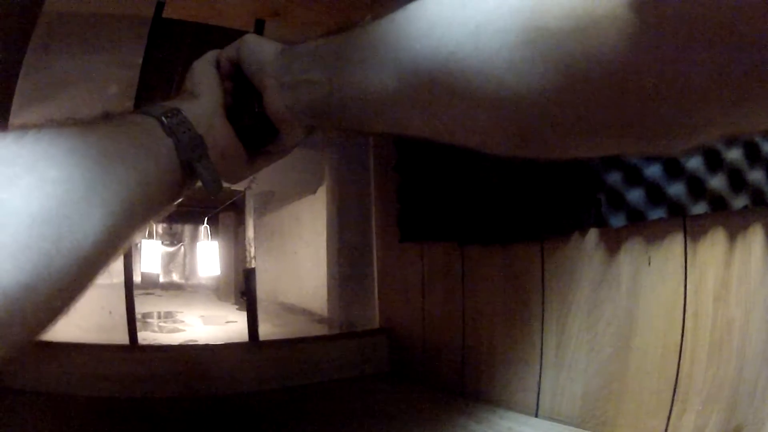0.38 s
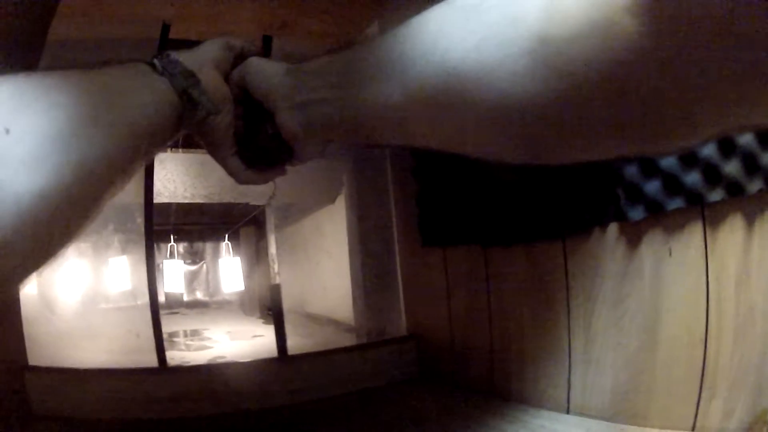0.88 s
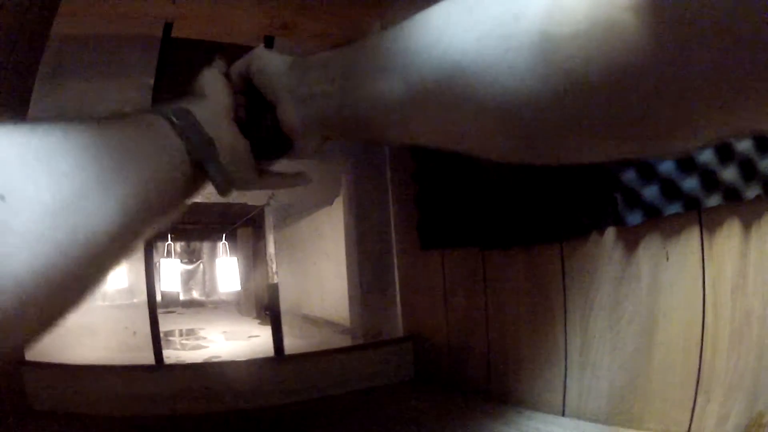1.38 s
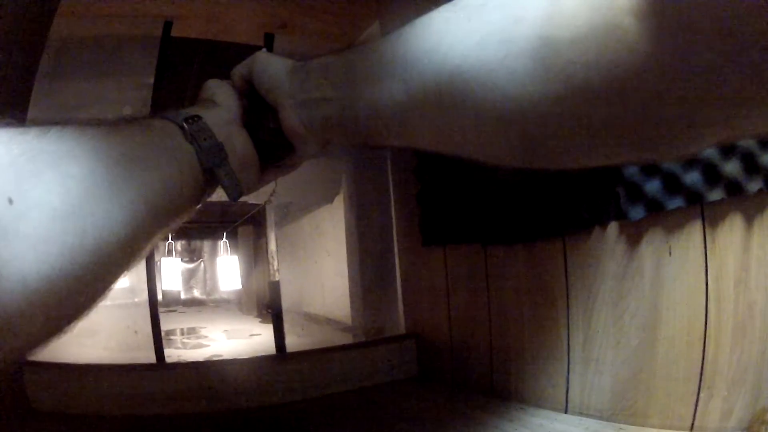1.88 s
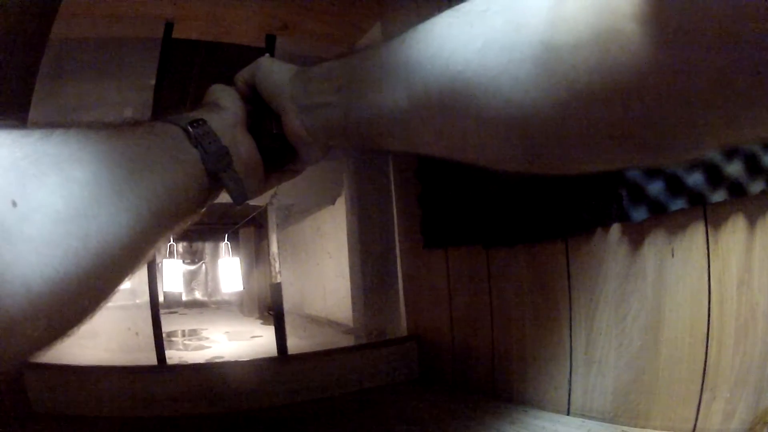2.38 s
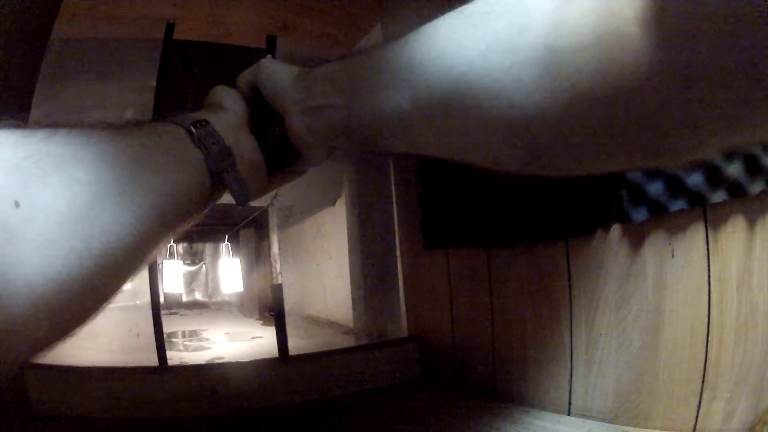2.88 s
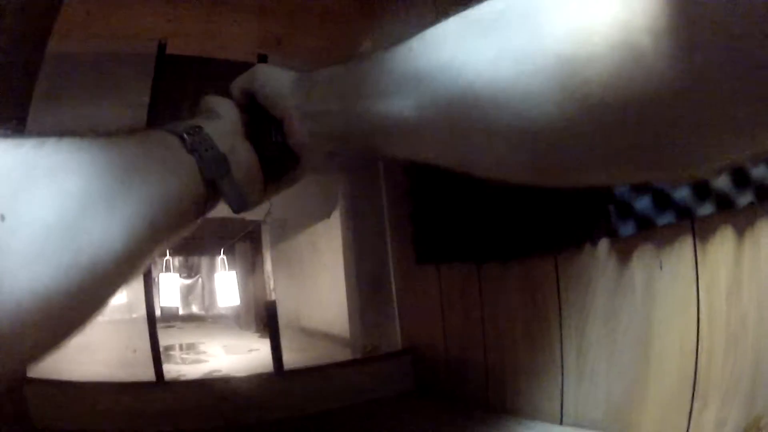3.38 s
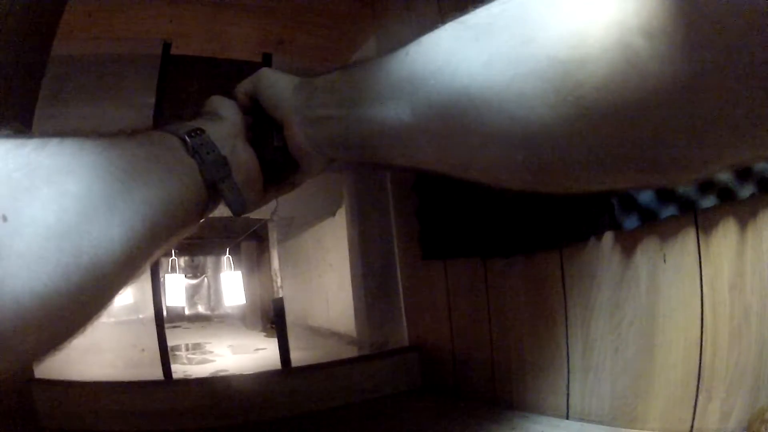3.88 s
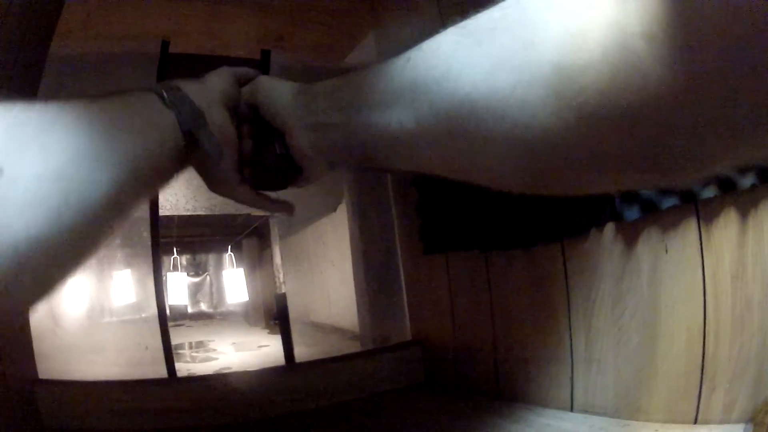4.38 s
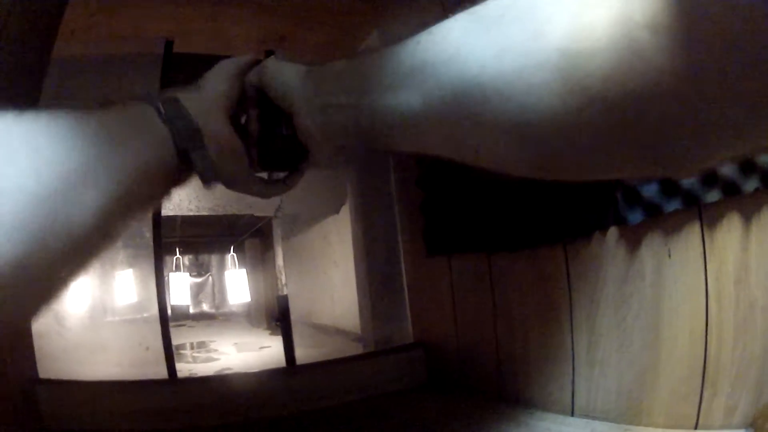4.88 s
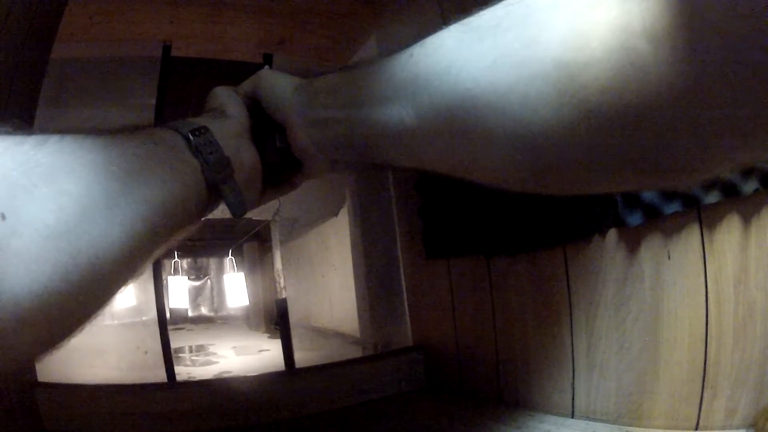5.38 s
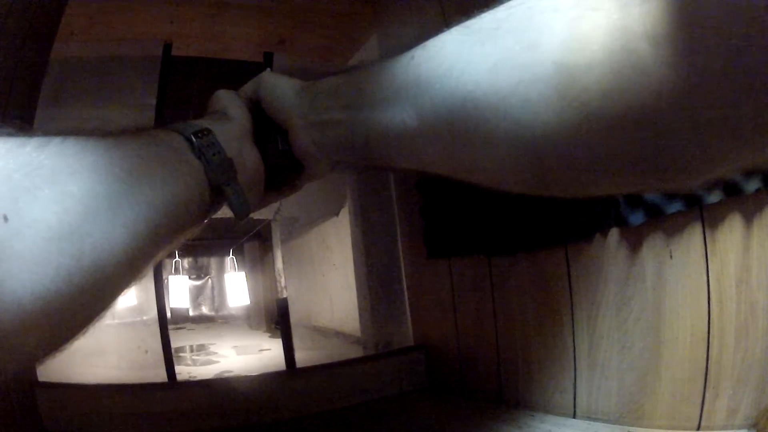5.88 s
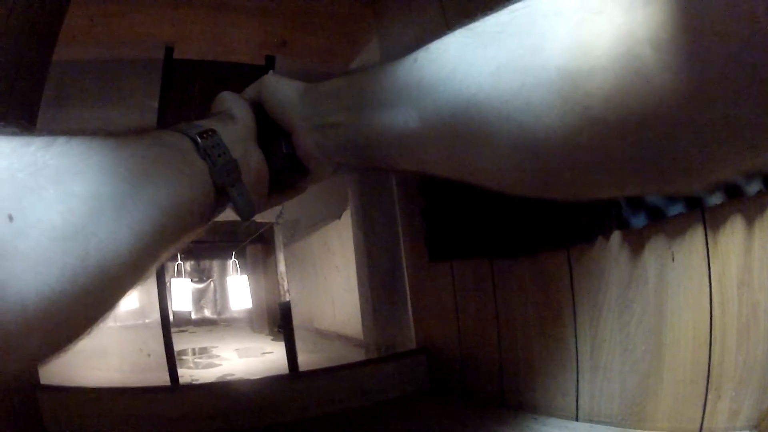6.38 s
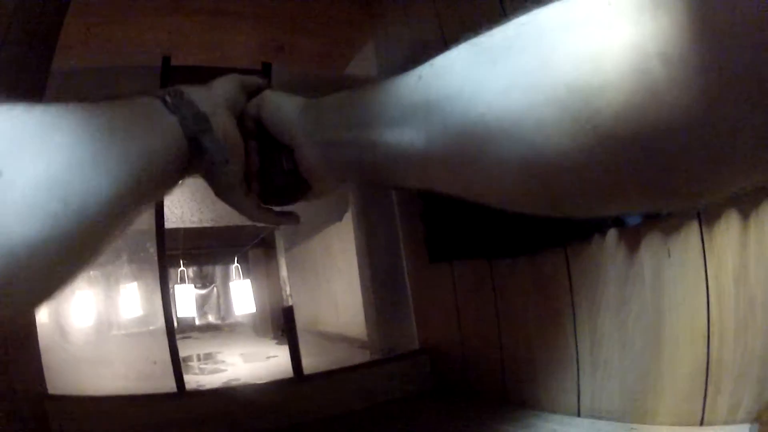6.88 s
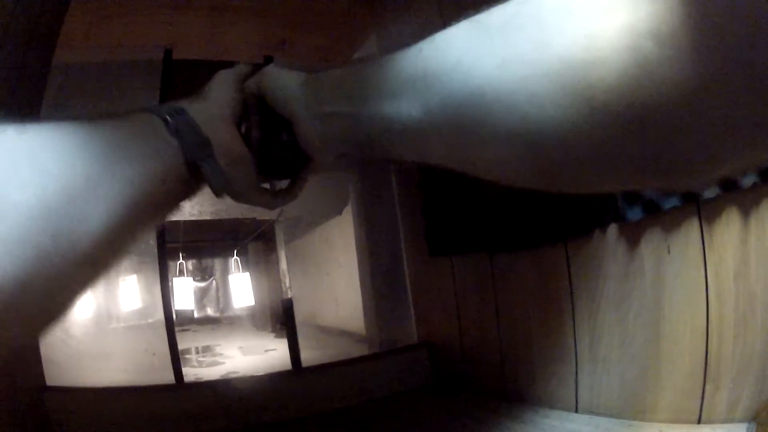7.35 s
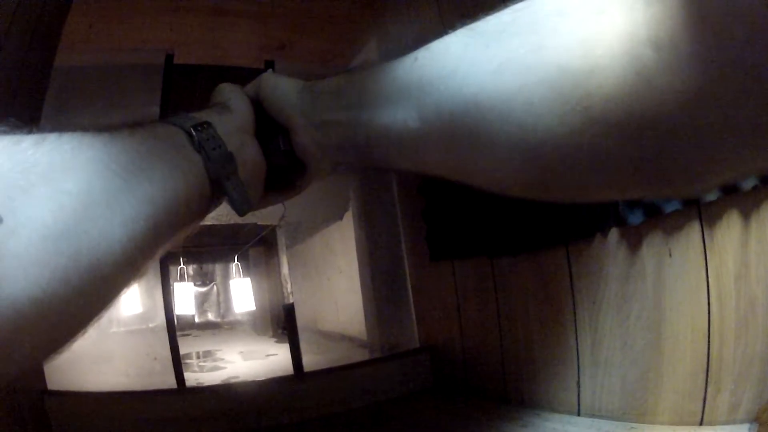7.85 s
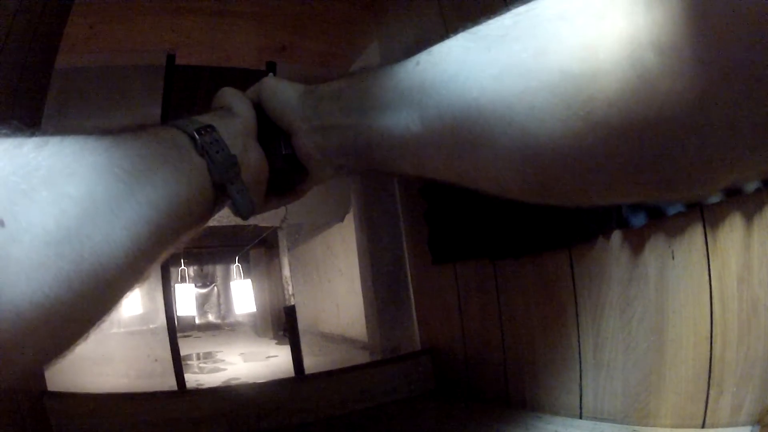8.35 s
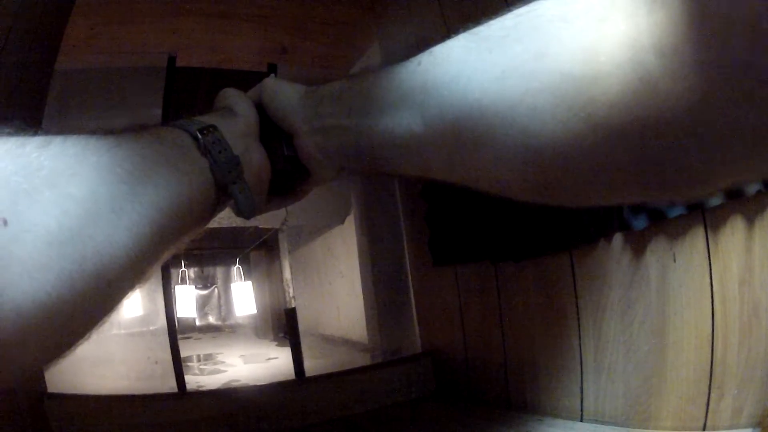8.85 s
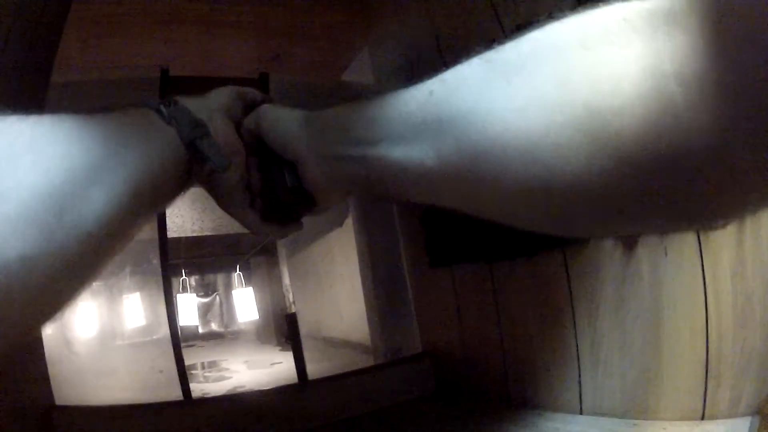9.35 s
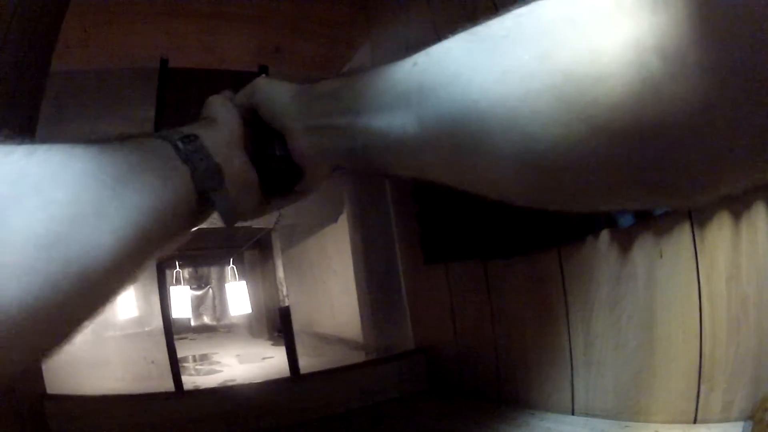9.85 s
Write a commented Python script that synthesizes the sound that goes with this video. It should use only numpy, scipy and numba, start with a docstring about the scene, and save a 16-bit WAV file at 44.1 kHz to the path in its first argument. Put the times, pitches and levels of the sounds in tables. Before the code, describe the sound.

A steady, quiet ventilation hum with fuzzy low fan tones fills an indoor range booth. Around 0.7-0.9 s hands and sleeves rub briefly with small dull ticks; at 1.05 s the pistol hammer is cocked, a crisp cluster of short steel clicks. Near-quiet follows, with barely audible rubs around 1.5 and 2.4 s. At 3.1 s a handgun shot bursts out, hard and clipped; the level drops sharply, then a hollow, ringing lane echo swells and decays for over a second. Light ticks at 4.5 s and another cocking at 4.7 s. The second shot comes at 6.5 s with a thinner, less bassy echo, and a cocking at 7.15 s sounds within its tail. The third and strongest blast is at 8.9 s, cocking again at 9.5 s over the fading echo. The close cased camera sounds boxy, nearly mono, with gritty treble.

```python
"""Indoor range, three shots

Three handgun shots in a range booth over ventilation hum; between them hands shift and the hammer clicks back.
Shots are noise bursts, pressure pulses and case ring with a band-wise decaying echo; clicks are steel modes.
Rubbing is flickering noise, ventilation is shaped noise with fuzzy fan tones.
A cased action camera overloads; its late gain control cuts deep and lets go, so the dying echo swells first.
Sampling is at a low rate and each sample is held, which mirrors the spectrum into the treble."""
import sys
import numpy as np
from scipy import signal
from scipy.io import wavfile
from scipy.ndimage import uniform_filter1d
from numba import njit

SR = 44100
rng = np.random.default_rng(int(sys.argv[2]) if len(sys.argv) > 2 else 0)


def dump_mix(stems):
    """Bounce the given channels to the path in sys.argv[1] as a 16-bit WAV at rate SR."""
    frames = np.atleast_2d(stems).T  # one column per channel
    limited = np.clip(frames, -1, 1)  # hard clip at full scale
    pcm = np.round(limited * 32767).astype(np.int16)
    wavfile.write(sys.argv[1], SR, pcm)


def invert_db(x):
    """Field ratio 10**(x/20) for x, a level in decibels (scalar or array-like)."""
    u = np.asarray(x, float) / 20
    return 10 ** u


N = 440559


def evened(x):
    """Scales to unit rms."""
    return x / np.sqrt(np.mean(x ** 2) + 1e-20)


def read(points, hz):
    """Interpolates a table over log frequency."""
    f, value = np.transpose(points)
    return np.interp(np.log(hz + 1), np.log(f + 1), value)


def humps_db(table, hz):
    """Rounded peaks on a spectrum."""
    return sum(db / (1 + (2 * (hz - f) / width) ** 2) for f, width, db in table)


def add(mix, start_s, sound):
    """Adds a sound in place, cut at the end of the mix."""
    part = mix[round(start_s * SR):][:len(sound)]
    part += sound[:len(part)]


def noise(count, db_at, size=1024):
    """Random short-time spectra shaped by db_at(Hz, s)."""
    hop = size // 4
    frames = count // hop + 5
    hz = np.fft.rfftfreq(size, 1 / SR)[:, None]
    real, imag = rng.standard_normal((frames, len(hz), 2)).T
    spectra = (real + 1j * imag) * invert_db(db_at(hz, np.arange(frames) * hop / SR))
    return signal.istft(spectra, nperseg=size, noverlap=size - hop)[1][:count]


def band(count, hz, width_hz):
    """Noise through one resonance: a fuzzy tone of unit rms."""
    pole = np.exp(-np.pi * width_hz / SR)
    slow = signal.lfilter([1], [1, -pole], rng.standard_normal((count, 2)) @ [1, 1j])
    return evened((slow * np.exp(2j * np.pi * hz * np.arange(count) / SR)).real)


# booth burst spectrum: (frequency [Hz], relative density [dB])
BLAST_SPECTRUM = [(18, -25.5), (30, 5), (486, 6), (619, -2), (790, -9), (1640, -16.5), (2230, -5.5),
                  (3790, -9), (4630, -23.5), (5900, -21), (7670, -47), (13000, -120)]


def shot(room_bass, blast_db, echo_db, bass_db):
    """Crack, pressure push, ringing camera case and booth burst; then the echo builds up."""
    t = np.arange(2 * SR) / SR
    burst = evened(noise(len(t), lambda hz, s: read(BLAST_SPECTRUM, hz))) * invert_db(-60 * t / 0.28)
    case_ring = 0.4 * band(len(t), 2350, 300) * invert_db(-60 * t / 0.032)
    rise = 1 - np.exp(-(t / 0.0018) ** 2)
    crack = 0.2 * band(len(t), 4300, 900) * invert_db(-60 * t / 0.012)
    u = np.maximum(t - 0.0003, 0) / 0.00035
    push = -0.45 * u ** 2 * (1 - 0.38 * u) * np.exp(2 - u)
    heave = -0.3 * np.sin(2 * np.pi * 45 * t) * invert_db(-60 * t / 0.12)  # the air of the booth heaves
    blast = (burst + case_ring) * rise + crack + push + heave
    echo = (invert_db(bass_db) * room_bass + lanes(low=False)) * (1 - np.exp(-t / 0.0092))
    return invert_db(blast_db) * blast + invert_db(echo_db) * echo


# long-lane echo spectrum: (frequency [Hz], relative density [dB])
ECHO_SPECTRUM = [(35, -61.5), (60, -34), (113, -11), (194, -20.5), (301, -4.5), (386, -15), (515, -4),
                 (589, -9), (833, -2), (1540, -9.5), (2300, -1.5), (3510, -10), (5900, -20), (7670, -59.5),
                 (13000, -120)]
# lane decay: (frequency [Hz], t60 [s])
LANE_T60 = [(60, 1.3), (150, 1.3), (300, 1.24), (700, 1.34), (1500, 1.264), (3000, 1.13), (5900, 0.96)]
# low standing waves between booth walls: (frequency [Hz], width [Hz], boost [dB])
BOOTH_MODES = [(120, 25, 7.5), (300, 58, 4), (460, 86, 6), (672, 30, 13)]


def lanes(low):
    """The long lanes ring on, each band at its own speed: the part below or above the crossover."""
    crossover_hz, slope = 900, 4 if low else -4

    def db_at(hz, s):
        share_db = -10 * np.log10(1 + ((hz + 1) / crossover_hz) ** slope)
        decay_db = -60 * (s - 0.45) / read(LANE_T60, hz)
        return read(ECHO_SPECTRUM, hz) + humps_db(BOOTH_MODES, hz) + decay_db + share_db

    return invert_db(-37.5) * noise(2 * SR, db_at)


# standing waves of the lanes; close pairs beat: (frequency [Hz], relative level [dB], t60 [s])
LANE_MODES = [(120, -39, 4), (124.6, -9, .3), (292.6, -13, 1.0), (293.9, -15, 1.0), (303, -24, 1.6),
              (477, -21, 1.4), (484, -30, 1.8), (514.3, -22, 1.3), (521, -7, .7)]


def standing_waves():
    """Pure low tones that start together and die away."""
    t = np.arange(2 * SR) / SR
    return sum(invert_db(db - 60 * t / t60) * np.sin(2 * np.pi * hz * t) for hz, db, t60 in LANE_MODES)


# steel modes: (nominal frequency [Hz], relative level [dB], t60 before the common fade [s])
STEEL_MODES = [(1367, -10.5, 0.077), (1790, -4.5, 0.1), (2160, -7, 0.065), (2430, -0.5, 0.062),
               (2640, -4.5, 0.064), (2970, -16, 0.088), (3380, -7.5, 0.076), (3736, -18, 0.11),
               (4610, -0.5, 0.069), (5660, -2.5, 0.033)]
# noise of a click: (frequency [Hz], relative density [dB])
SCRATCH_SPECTRUM = [(600, -15), (1400, -11.5), (2100, -1.5), (3600, -1.5), (5000, -4.5), (5900, -18)]


def click(db, bright_db_per_octave, t60_s, ring_hz):
    """A steel part snaps: its modes ring briefly, the struck spot pings, over a scratch of noise."""
    t = np.arange(round(0.2 * SR)) / SR

    def spot_db(hz):
        return bright_db_per_octave * np.log2(hz / 2500) + humps_db([(ring_hz, 600, 6)], hz)

    def tail_db(hz, s):
        return read(SCRATCH_SPECTRUM, hz) - 1.2 * np.log2((hz + 1) / 2500)

    ring = np.zeros(len(t))
    for hz, level_db, decay_s in STEEL_MODES:
        detune, phase, strength = rng.random(3)
        mode_db = level_db + 3.8 * (strength - 2) + spot_db(hz)
        mode_hz = hz * (1 + 0.034 * (detune - 0.5))
        ring += invert_db(mode_db - 60 * t / decay_s) * np.sin(2 * np.pi * (mode_hz * t + phase))
    ping = 0.43 * np.sin(2 * np.pi * ring_hz * t) * invert_db(-60 * t / 0.038)
    scratch = evened(noise(len(t), lambda hz, s: read(SCRATCH_SPECTRUM, hz) + spot_db(hz + 1), size=256))
    tail = evened(noise(len(t), tail_db, size=256)) * invert_db(-34 - 60 * t / 0.4)
    rise = 1 - np.exp(-(t / 0.0006) ** 2)
    body = (0.42 * ring + ping + 0.35 * scratch) * invert_db(-60 * t / t60_s)
    return invert_db(db) * (body + tail) * rise


# the hammer is cocked: (time [s], level [dB], favoured ring [Hz])
COCKINGS = [(1.0482, -18.5, 3850), (4.715, -22.5, 3920), (7.1482, -19, 2910), (9.519, -20, 2000)]
# the parts settle after a cocking: (delay [s], relative level [dB])
SETTLINGS = [(0, 0.5), (.0052, -5), (.0108, -6.5), (0.0184, -15.5)]
# single ticks of small parts: (time [s], level [dB], brightness [dB/octave], favoured ring [Hz])
SMALL_TICKS = [(0.8355, -44, -14, 1210), (0.8649, -32.5, -8.5, 1120), (0.9112, -44, -8, 1900),
               (0.9757, -50.5, 0, 2000), (1.0006, -46, 0, 2724), (1.281, -50, -3, 1920),
               (4.5431, -27, -1.5, 2000), (4.656, -44.5, 2, 3150), (4.8065, -45.5, 3, 2390),
               (7.2647, -38.5, 0, 2384)]


def action_clicks():
    """Cockings as clusters of settling clicks, and single ticks."""
    out = np.zeros(N)
    lead_s = 0.001
    for s, db, ring_hz in COCKINGS:
        for delay_s, less_db in SETTLINGS:
            add(out, s + delay_s - lead_s, click(db + less_db, 1.5, 0.033, ring_hz))
    for s, db, bright_db_per_octave, ring_hz in SMALL_TICKS:
        add(out, s - lead_s, click(db, bright_db_per_octave, 0.027, ring_hz))
    return out


# cloth noise: (frequency [Hz], relative density [dB])
RUB_SPECTRUM = [(240, -48), (400, -5), (1460, -5), (1870, -10.5), (3180, -9), (4020, -35.5), (5100, -17),
                (5900, -44), (7670, -74), (13000, -120)]


def rustle():
    """Cloth noise that flickers, with short bursts where fibres catch and let go."""
    snags_per_s, snag_share = 350, 0.31
    snag_amp = invert_db(4 * np.minimum(rng.exponential(1, SR), 4))
    snags = (rng.random(SR) < snags_per_s / SR) * snag_amp
    bursts = evened(signal.oaconvolve(snags, np.exp(-np.arange(400) / (0.0016 * SR)))[:SR])
    flicker = evened(invert_db(2.6 * evened(uniform_filter1d(rng.standard_normal(SR), 70))))
    envelope = (1 - snag_share) * flicker + snag_share * bursts
    return evened(envelope * noise(SR, lambda hz, s: read(RUB_SPECTRUM, hz)))


def stroke(top_s, rise_s, fall_s, db, sound):
    """A movement swells to its top and sinks back; returns its start [s] and sound."""
    swell_db = 17.5
    t = np.arange(-rise_s, fall_s, 1 / SR)
    sunk = np.where(t < 0, -t / rise_s, t / fall_s)
    envelope = invert_db(db - swell_db * sunk ** 1.12) * signal.windows.tukey(len(t), 0.15)
    return top_s - rise_s, envelope * sound[:len(t)]


# hands and sleeves rubbing: (top [s], rise [s], fall [s], rub level [dB], low push level [dB])
HAND_RUBS = [(.668, 0.09, 0.077, -50, -47), (.868, .06, 0.061, -52, -48.5), (1.51, .04, 0.045, -69, -72),
             (2.44, .04, .04, -65, -70), (6.13, 0.048, .06, -64, -70)]
# body movement nudging the camera: (top [s], rise [s], fall [s], level [dB])
CAMERA_NUDGES = [(1.09, .15, .12, -56), (4.77, .12, 0.098, -53.5), (7.05, 0.098, .05, -58),
                 (7.19, 0.09, 0.304, -55.5), (9.47, .1, 0.49, -48)]


def handling():
    """Grainy rubbing with a low push, and slow nudges of low fuzzy tone."""
    out = np.zeros(N)
    for top_s, rise_s, fall_s, db, push_db in HAND_RUBS:
        add(out, *stroke(top_s, rise_s, fall_s, db, rustle()))
        add(out, *stroke(top_s, rise_s, fall_s, push_db, band(SR, 130, 38)))
    for nudge in CAMERA_NUDGES:
        add(out, *stroke(*nudge, band(SR, 36, 22)))
    return out


# air noise: (frequency [Hz], relative density [dB])
VENT_SPECTRUM = [(12, -42.5), (20, -8.5), (58, -8), (85, -24), (114, 1.5), (151, -17), (309, -5.5),
                 (348, -13.5), (587, -19.5), (630, -21), (1260, -27.5), (2390, -27.5), (5900, -37.5),
                 (7670, -78.5), (13000, -120)]
# fan tones: (frequency [Hz], width [Hz], rms level [dB])
FAN_TONES = [(119.8, 37, -59.5), (298.5, 21, -65), (638, 2.9, -76.5), (720, 4.16, -78.5), (1340, 8.3, -82),
             (2363, 12, -85.5)]


def ventilation():
    """Steady air noise that wavers a little, with fuzzy fan tones."""
    t = np.arange(N) / SR
    waver_hz = np.geomspace(0.2, 6, 20)
    waver = evened(sum(np.sin(2 * np.pi * (f * t + rng.random())) / np.sqrt(f) for f in waver_hz))
    air = evened(noise(N, lambda hz, s: read(VENT_SPECTRUM, hz), size=4096))
    tones = sum(invert_db(db) * band(N, hz, width_hz) for hz, width_hz, db in FAN_TONES)
    return invert_db(-58.5 + 0.38 * waver) * air + tones


# shots: (time [s], blast gain [dB], echo gain [dB], extra gain of the echo bass [dB])
SHOT_LIST = [(3.1102, -1, 1, 2.5), (6.4628, -2, -3, -5), (8.9408, 2.5, 1, 2)]


def scene():
    """Shots over handling and ventilation; all shots share one echo bass."""
    mix = ventilation() + handling() + action_clicks()
    room_bass = lanes(low=True) + standing_waves()
    for s, *gains_db in SHOT_LIST:
        add(mix, s, shot(room_bass, *gains_db))
    return np.array([mix, mix])


LOW_RATE_HZ = 12000
# resonances of the camera case: (frequency [Hz], width [Hz], boost [dB])
CASE_MODES = [(1295.4, 250, 3), (1903, 210, 10), (2334, 96, 7.5), (2727, 51, 2.5), (3461, 260, 4.5),
              (4490, 250, 0.5)]


def case_resonances(low):
    """The case colours the low-rate signal; the top rolls off above 5.7 kHz."""
    hz = np.fft.rfftfreq(1024, 1 / LOW_RATE_HZ)
    edge_db = -8 * np.clip((hz - 5700) / 300, 0, 1) ** 2
    doubled_db = 2 * (humps_db(CASE_MODES, hz) + edge_db)  # minimum_phase halves the dB
    taps = signal.minimum_phase(signal.firwin2(1023, hz, invert_db(doubled_db), fs=LOW_RATE_HZ))
    return signal.oaconvolve(low, taps)[:len(low)]


@njit
def late_gain_control(x, lag, limit, fade, depth_db, attack, recover_db, keep):
    """Dives towards its deepest cut while the delayed output is too loud; recovers, faster when deep."""
    out, peak, cut_db = np.zeros(len(x)), 0., 0.
    for n in range(lag, len(x)):
        peak = max(abs(out[n - lag]), peak * fade)
        cut_db += attack * (depth_db - cut_db) * min(max(peak / limit - 1, 0.), 1.)
        cut_db = max(keep * cut_db - recover_db, 0.)
        out[n] = x[n] * 10 ** (-cut_db / 20)
    return out


def camera_gain(low):
    """Sets the late gain control in seconds and dB."""
    lag_s, peak_fade_s, attack_s, recover_s = 0.0087, 0.0018, 0.005, 0.62
    limit, depth_db, recover_db_per_s = 0.69, 41.3, 50
    return late_gain_control(low, round(lag_s * LOW_RATE_HZ), limit, np.exp(-1 / (peak_fade_s * LOW_RATE_HZ)),
                             depth_db, 1 / (attack_s * LOW_RATE_HZ), recover_db_per_s / LOW_RATE_HZ,
                             np.exp(-1 / (recover_s * LOW_RATE_HZ)))


def held_samples(low):
    """Clips, then holds each sample four times, which mirrors the spectrum into the treble."""
    held = np.repeat(np.clip(low, -0.95, 0.95), 4)
    return signal.resample_poly(held, 147, 160)[:N]  # 48 kHz to SR


def channel_difference(mono):
    """Half the left-right difference: faint low-weighted hiss, and less bass on the left."""
    hiss = invert_db(-89.5) * signal.lfilter([1], [1, -0.97], rng.standard_normal(N))
    bass = signal.lfilter(*signal.butter(N=1, Wn=60, fs=SR), mono)
    return hiss - invert_db(-26.5) * bass


def band_limit(x):
    """A steep low-pass at the top of the band."""
    return signal.sosfilt(signal.butter(12, 15620, fs=SR, output="sos"), x)


def record(dry):
    """Low-rate sampling, case resonances, gain control, clipped and held samples, two channels."""
    low = signal.resample_poly(dry[0], 40, 147)  # SR to LOW_RATE_HZ
    low = camera_gain(case_resonances(low))
    mono = held_samples(low)
    side = channel_difference(mono)
    return band_limit(np.array([mono + side, mono - side]))


dry = scene()
out = record(dry)
dump_mix(out)
```